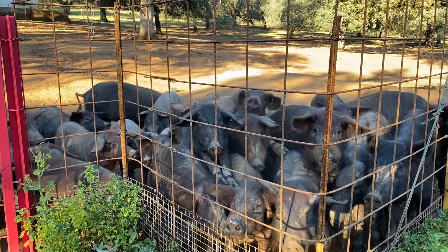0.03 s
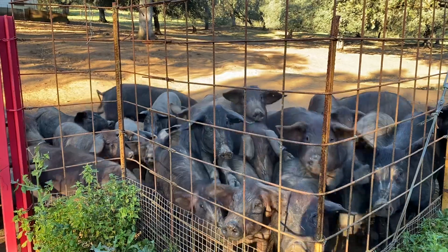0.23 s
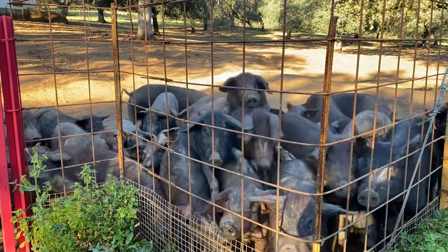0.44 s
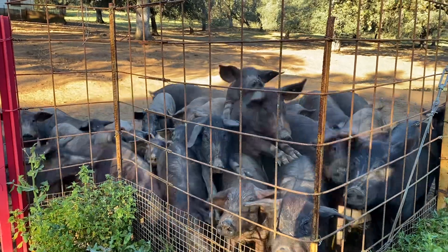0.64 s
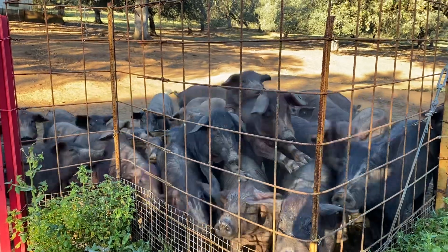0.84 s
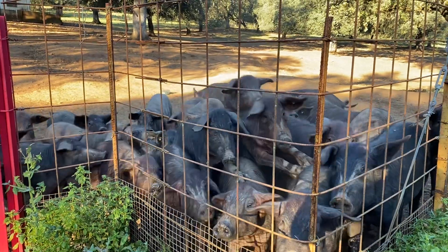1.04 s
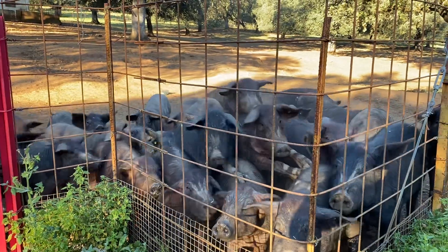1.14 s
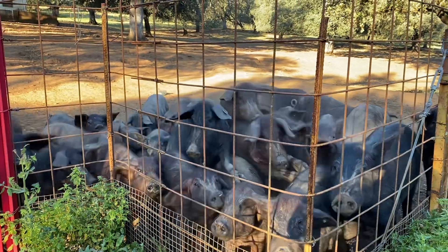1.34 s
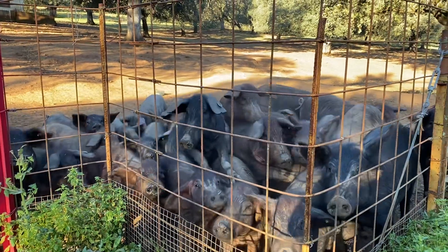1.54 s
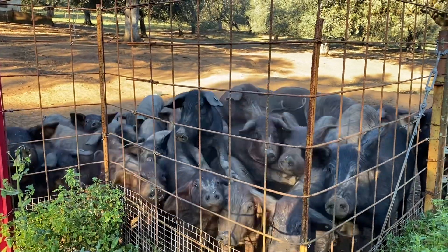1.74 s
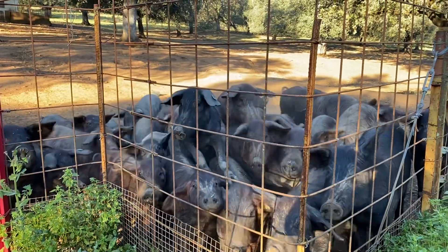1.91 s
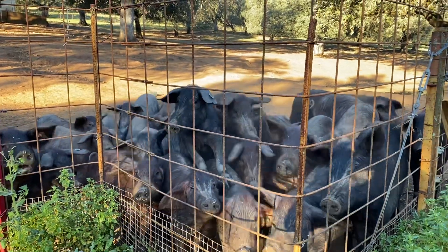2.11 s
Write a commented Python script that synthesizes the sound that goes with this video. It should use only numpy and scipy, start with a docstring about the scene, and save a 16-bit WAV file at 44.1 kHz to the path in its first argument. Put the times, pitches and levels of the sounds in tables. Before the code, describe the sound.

A herd of pigs: a harsh squealing scream, then rough growls and overlapping deep grunts

```python
"""A pig screams hoarsely close by, with a falling whistle in the scream; it stands in a crowded outdoor pen.
Deep growls, a slow croak, a short squeal and overlapping grunts follow. Each call is a train of throat
flaps: every flap is a snap and a puff of noisy air, coloured by the throat. Whistles are wavering sines.
The rest of the herd mutters and shuffles behind as filtered noise; bodies and ground give short reflections."""
import sys
import numpy as np
from scipy import signal
from scipy.fft import rfft, irfft, next_fast_len
from scipy.io import wavfile
from scipy.ndimage import map_coordinates

SR = 44100
rng = np.random.default_rng(int(sys.argv[2]) if len(sys.argv) > 2 else 0)


def unload_audio(sound):
    """Save the sound as a 16-bit wav file, at the path given as the first command line argument."""
    columns = np.transpose(np.atleast_2d(sound))
    # keep every value between -1 and 1, then stretch to whole-number steps
    steps = np.round(np.clip(columns, -1, 1) * 32767)
    wavfile.write(sys.argv[1], SR, steps.astype(np.int16))


N = 95829

# The scream's rough flutter: (time [s], flap rate [Hz], level [dB])
SCREAM_FLAPS = [(.033, 296.9, -31.5), (.19, 242, -30), (.3, 170.8, -35.5), (.32, 150, -68),
                (.34, 142.7, -71)]
# The whistle inside the scream: (time [s], pitch [Hz], level [dB])
SCREAM_WHISTLE = [(.08, 1510, -45.5), (.15, 1430, -33), (.172, 1395, -25.5), (.205, 1373, -26),
                  (.235, 1371, -35), (.272, 1276, -31), (.315, 1160, -36)]
# Three falling overtones of the scream, each: (time [s], pitch [Hz], level [dB])
SCREAM_OVERTONES = [
    [(.04, 2243, -50), (.075, 2000, -32), (.125, 1790, -56)],
    [(.035, 3310, -38.5), (.09, 3040, -40), (.31, 2925, -46)],
    [(.035, 5250, -37.5), (.14, 4510, -45), (.3, 4040, -42.5)],
]
# Two growls of the nearest pig: (time [s], flap rate [Hz], level [dB])
SHORT_GROWL_FLAPS = [(.286, 71.25, -30), (.36, 71.25, -33), (.505, 72.67, -35), (.525, 78, -39.5)]
LONG_GROWL_FLAPS = [(.824, 70.48, -30), (.853, 65.06, -29), (.894, 83.64, -34), (.907, 73.27, -28),
                    (.96, 78.8, -30), (.997, 76.71, -26.5), (1.066, 72.35, -29.5), (1.146, 78.64, -28.5),
                    (1.186, 63.66, -36), (1.255, 63.94, -32.5)]
# A slow croak and a short rasping squeal: (time [s], flap rate [Hz], level [dB])
CROAK_FLAPS = [(.553, 33.57, -45.5), (.581, 37.3, -43.5), (.635, 35.66, -51.5), (.663, 37.65, -49),
               (.69, 50.3, -49), (.727, 44.97, -44.5), (.75, 59.3, -35.5), (.797, 82.5, -40)]
SQUEAL_FLAPS = [(.79, 190.5, -37), (.865, 204.7, -32), (.88, 179, -68)]
# A brief rising chirp in the croak: (time [s], pitch [Hz], level [dB])
CROAK_CHIRP = [(.662, 1460, -37), (.67, 1730, -38.5)]
# Grunts (the soft ones are a list of two calls): (time [s], flap rate [Hz], level [dB])
SOFT_GRUNT_FLAPS = [
    [(1.289, 59.6, -48.5), (1.35, 49.4, -73), (1.44, 96.9, -41), (1.48, 78.6, -56)],
    [(1.531, 154, -38.5), (1.545, 119.2, -59)],
]
FIRST_GRUNT_FLAPS = [(1.577, 80.45, -41), (1.636, 69.3, -35.5), (1.716, 68.33, -36), (1.888, 81.5, -34.5)]
LAST_GRUNT_FLAPS = [(1.966, 71.5, -36.5), (2.059, 74.8, -37), (2.121, 68.9, -36.5), (2.17, 67.4, -36.5)]
# A nasal snort through most of the first grunt, strongest at its end: (time [s], flap rate [Hz], level [dB])
SNORT_FLAPS = [(1.604, 37, -47), (1.66, 36.2, -48), (1.8, 80.4, -41)]
# A rattling grunt: (time [s], flap rate [Hz], level [dB])
RATTLE_FLAPS = [(1.778, 49.95, -39.5), (1.83, 43.33, -32.5), (1.88, 51.63, -38), (1.96, 51.2, -37),
                (2.03, 45.1, -40)]
# The voiced hum inside the first grunt: (time [s], pitch [Hz], level [dB])
GRUNT_HUM = [(1.66, 222, -57), (1.69, 220.7, -37.5), (1.85, 210.5, -47)]
# The moving mouth resonance of the rattling grunt: (time [s], centre [Hz])
MOUTH_RESONANCE = [(1.78, 730), (1.87, 810), (1.955, 1170), (2.03, 980)]

# Tone colours of throats and snout: (frequency [Hz], relative level [dB])
SCREAM_COLOUR = [(80, -37), (240, -4.5), (1100, 0.5), (1250, -7.5), (2120, 0), (2630, -12.5), (3030, -4),
                 (3460, -8.5), (4400, -5), (6100, -6.5), (8600, -17.5), (11800, -14), (14000, -66)]
SQUEAL_COLOUR = [(300, -21), (1380, -3), (1800, -14), (2600, -4), (3300, -18.5), (5100, -16.5), (6500, -39)]
CROAK_COLOUR = [(80, -23), (720, 8), (950, 1.5), (2400, -2), (4800, -22.5), (14000, -52)]
GRUNT_COLOUR = [(40, -17), (90, 1.5), (400, 8.5), (850, -0.5), (1120, -4.5), (2250, -17), (2750, -15.5),
                (4050, -20.5), (5400, -30), (7700, -24.5), (15000, -74)]
SNORT_COLOUR = [(600, 3), (2250, -0.5), (2800, 7.5), (3300, -7), (4050, -2.5), (6000, -18.5)]
RATTLE_COLOUR = [(100, -35), (900, 2.5), (1300, -2), (1700, -17), (3200, -15.5), (3900, -8.5), (4500, -23),
                 (15000, -44)]
# Resonances of the growling throat: (centre [Hz], width [Hz], level [dB])
GROWL_RESONANCES = [(80, 38, 3.5), (336, 99, 5.5), (647, 92, 7), (1043, 79, 3.5), (1738, 148, -3),
                    (2596, 166, -3), (3930, 110, -12), (4640, 75, -18)]

# Colours of the herd's muttering and of feet in dry dirt: (frequency [Hz], relative level [dB])
HERD_COLOUR = [(30, -33.5), (70, 4), (120, 0), (350, -4), (3000, -46.5)]
FEET_COLOUR = [(1000, -1), (9000, -16), (15500, -19)]
# Loudness of the muttering: (time [s], level [dB])
HERD_LOUDNESS = [(0, -73), (.2, -42.5), (.72, -45.5), (1.0, -36), (1.35, -51), (1.52, -61), (1.9, -40)]
# How the close pigs sit between the ears: (frequency [Hz], left minus right [dB])
EAR_BALANCE = [(200, -1), (600, -3.3), (1300, -3.7), (3100, -1.5), (4500, 5), (8000, -1)]

GROWL_AIR_DB = -57  # weak bed of air under the growl resonances
JITTER_S = .0003  # typical timing unevenness of the flaps
SHUFFLE_DB = -51  # feet, before their level wavers
NEAR_T60_S, NEAR_DB = .035, -4  # time to die by 60 dB, and gain into the mix
FAR_T60_S, FAR_DB = .22, -16
RIGHT_LAG_S = .00004  # the right ear hears the close pigs this much later
START_S, TOP_HZ = .035, 15850


def amp(db):
    """Turn decibels into a gain."""
    return 10 ** (np.asarray(db) / 20)


def unit(x):
    """Scale a sound to an average (rms) strength of 1."""
    return x / np.sqrt(np.mean(x ** 2) + 1e-20)


def along(points, hz):
    """Read a (frequency, value) curve at any frequency, on a log scale."""
    f, v = np.transpose(points)
    return np.interp(np.log(hz + 1), np.log(f + 1), v)


def curves(rows):
    """Rate or pitch, and gain, at every sample of a call; zero outside it."""
    s, hz, db = np.transpose(rows)
    t = np.arange(N) / SR
    on = (t >= s[0]) & (t <= s[-1])
    return on * np.interp(t, s, hz), on * amp(np.interp(t, s, db))


def wobble(rate):
    """A smooth random curve with this many new random values a second."""
    return map_coordinates(rng.standard_normal(8192), [np.arange(N) * rate / SR], mode="wrap")


def filtered(x, response):
    """Multiply the spectrum of a sound by a response to frequency."""
    m = next_fast_len(N + SR // 4)
    return irfft(rfft(x, m) * response(np.fft.rfftfreq(m, 1 / SR)), m)[..., :N]


def resonate(x, colour, size=8192):
    """Ring a sound through a filter of this colour, which only rings afterwards and has unit energy."""
    # Folding the cepstrum forward makes the filter minimum phase
    cepstrum = irfft(np.log(amp(along(colour, np.fft.rfftfreq(size, 1 / SR)))))
    cepstrum[1:size // 2] *= 2
    cepstrum[size // 2 + 1:] = 0
    ring = irfft(np.exp(rfft(cepstrum)))
    return signal.fftconvolve(x, ring / np.linalg.norm(ring))[:N]


def reshaped(x, change_db):
    """Give a sound a gain that varies with both frequency and time."""
    hz, t, z = signal.stft(x, SR, nperseg=256, noverlap=192)
    z = z * amp(change_db(hz[:, None], t))
    return signal.istft(z, SR, nperseg=256, noverlap=192)[1][:N]


def flicker(hz, t):
    """Soft tissue never closes the same way twice: the colour varies at random, least in the bass."""
    field = rng.standard_normal((64, 256))
    where = np.broadcast_arrays(np.log2(1 + hz / 400) * 1.5, t * 70)
    return map_coordinates(field, where) * hz / (hz + 300)


def voice(rows, throat, rough, puff_s, vary_db=2):
    """Throat flaps, each a snap plus a dying puff of air; rough is the puffs' share of the power."""
    rate, gain = curves(rows)
    # A flap falls wherever the running count of cycles passes a whole number
    at = np.flatnonzero(np.diff(np.ceil(np.cumsum(rate) / SR), prepend=0))
    chance = rng.standard_normal(256)[:len(at)]
    uneven = np.clip(at + (JITTER_S * SR * chance).astype(int), 0, N - 1)
    snaps = np.zeros(N)
    snaps[uneven] = gain[at] * np.sqrt(SR / rate[at])  # same power at any rate

    u = np.arange(SR // 20) / SR / puff_s
    shape = np.sqrt(u) * np.exp(-2 * u)
    puff_power = signal.fftconvolve(snaps ** 2, shape / shape.sum())[:N]
    puffs = np.sqrt(np.abs(puff_power)) * rng.standard_normal(N)

    share = np.clip(rough, 0, 1)
    sound = resonate(np.sqrt(1 - share) * snaps + np.sqrt(share) * puffs, throat)
    return reshaped(sound, lambda hz, t: vary_db * flicker(hz, t))


def tone(rows, waver, flutter_db, flutter_hz):
    """A single sine whose pitch and loudness both waver at random."""
    hz, gain = curves(rows)
    phase = 2 * np.pi * np.cumsum(hz * (1 + waver * wobble(flutter_hz))) / SR
    return np.sqrt(2) * gain * np.sin(phase) * unit(amp(flutter_db * wobble(2 * flutter_hz)))


def scream():
    """A hoarse scream: rough flapping, a whistle and falling overtones."""
    hoarse = voice(SCREAM_FLAPS, SCREAM_COLOUR, rough=0.77, puff_s=0.0085)
    whistle = tone(SCREAM_WHISTLE, waver=0.0044, flutter_db=4.5, flutter_hz=254)
    overtones = sum(tone(line, waver=0.019, flutter_db=5, flutter_hz=299) for line in SCREAM_OVERTONES)
    return hoarse + whistle + overtones


def herd():
    """Low muttering of the crowd, the same at both ears, and the shuffle of feet, separate at each ear."""
    level_db = np.interp(np.arange(N) / SR, *np.transpose(HERD_LOUDNESS))
    mutter = amp(level_db + 0.82 * wobble(26.2)) * resonate(rng.standard_normal(N), HERD_COLOUR)
    feet = np.array([resonate(rng.standard_normal(N), FEET_COLOUR) for side in range(2)])
    scuffs_db = .6 * wobble(12) + 1.8 * wobble(140)  # a slow and a fast waver
    return mutter + amp(SHUFFLE_DB + scuffs_db) * feet


def formants(modes, air_db):
    """Colour of a throat: a peak at each resonance, over a weak even bed of air."""
    hz = np.linspace(1, SR / 2, SR // 10)
    power = amp(air_db) ** 2
    for centre, width, db in modes:
        detuning = (hz * hz - centre * centre) / (hz * width)
        power = power + amp(db) ** 2 / (1 + detuning ** 2) ** 1.265
    return np.transpose([hz, 10 * np.log10(power)])


def growls():
    """The nearest pig growls twice; a croak and a rasping squeal fall in between."""
    throat = formants(GROWL_RESONANCES, GROWL_AIR_DB)
    short = voice(SHORT_GROWL_FLAPS, throat, rough=0.71, puff_s=0.0061)
    croak = voice(CROAK_FLAPS, CROAK_COLOUR, rough=0.8, puff_s=0.0035)
    chirp = tone(CROAK_CHIRP, waver=.01, flutter_db=1, flutter_hz=200)
    squeal = voice(SQUEAL_FLAPS, SQUEAL_COLOUR, rough=0.92, puff_s=0.0031)
    long = voice(LONG_GROWL_FLAPS, throat, rough=0.92, puff_s=0.0039)
    return short + croak + chirp + squeal + long


def mouth_db(hz, t, span_db=10, octaves=0.17):
    """A mouth resonance that slides in pitch: half the span up at its centre, half down far away."""
    distance = np.log2((hz + 1) / np.interp(t, *np.transpose(MOUTH_RESONANCE))) / octaves
    return span_db * (np.exp(-distance ** 2) - .5)


def grunts():
    """The neighbours grunt, snort and rattle over one another, with a hum in the first full grunt."""
    calls = (*SOFT_GRUNT_FLAPS, FIRST_GRUNT_FLAPS, LAST_GRUNT_FLAPS)
    deep = sum(voice(call, GRUNT_COLOUR, rough=0.85, puff_s=0.0068) for call in calls)
    snort = voice(SNORT_FLAPS, SNORT_COLOUR, rough=0.84, puff_s=0.0081)
    hum = tone(GRUNT_HUM, waver=0.015, flutter_db=-3.0, flutter_hz=43.5)
    rattle = voice(RATTLE_FLAPS, RATTLE_COLOUR, rough=0.85, puff_s=0.0035, vary_db=1)
    return deep + snort + hum + reshaped(rattle, mouth_db)


def reflections(x, t60):
    """Scattered dying echoes: alike at both ears in the bass, mostly from the sides in the treble."""
    t = np.arange(SR // 3) / SR
    tail = rng.standard_normal((2, len(t))) * amp(-60 * t / t60) * (1 - np.exp(-t / 0.0069))
    tail = tail / np.linalg.norm(tail, axis=1, keepdims=True)
    wet = signal.fftconvolve(x[None], tail, axes=1)[:, :N]

    def spread(hz):
        middle_and_side = np.array([np.full_like(hz, .7), 1.2 * hz / np.hypot(hz, 1000)])
        return hz / (hz + 400) * middle_and_side  # the bass is thinned in both

    mid, side = filtered(wet, spread)
    return np.array([mid + side, mid - side]) / np.sqrt(2)


def placed(x, balance):
    """Add near and far reflections, then set level and timing between the two ears."""
    near = amp(NEAR_DB) * reflections(x, NEAR_T60_S)
    far = amp(FAR_DB) * reflections(x, FAR_T60_S)
    side = np.array([[.5], [-.5]])  # left, right

    def ears(hz):
        return amp(side * along(balance, hz)) * np.exp(2j * np.pi * hz * side * RIGHT_LAG_S)

    return filtered(x + near + far, ears)


def scene():
    """The close pigs, louder on the right over most of the range, above the herd."""
    return placed(scream() + growls() + grunts(), EAR_BALANCE) + herd()


def record(dry):
    """The sound starts abruptly and has nothing above the band limit."""
    started = np.arange(N) / SR > START_S
    return filtered(dry * started, lambda hz: hz < TOP_HZ)


dry = scene()
out = record(dry)
unload_audio(out)
```